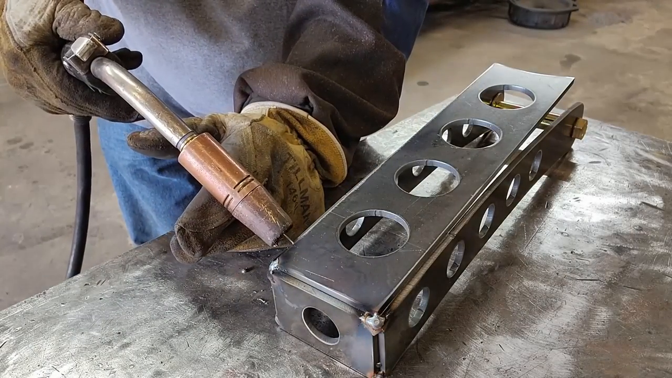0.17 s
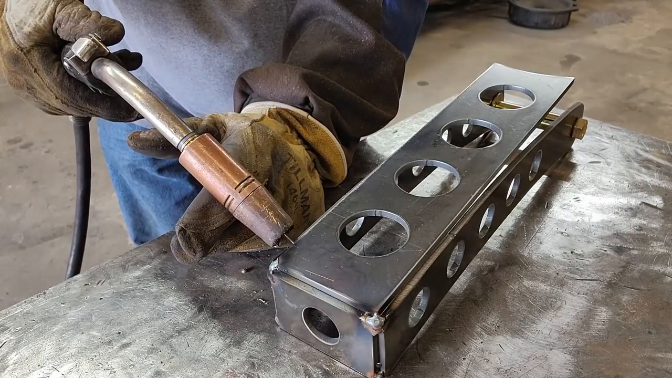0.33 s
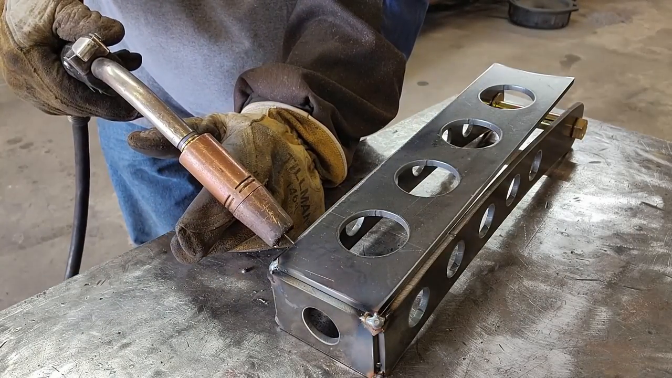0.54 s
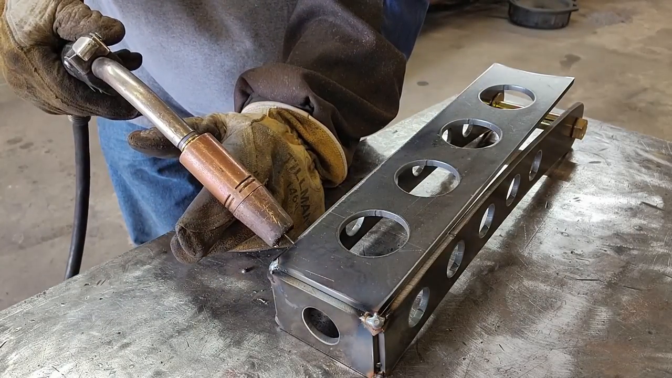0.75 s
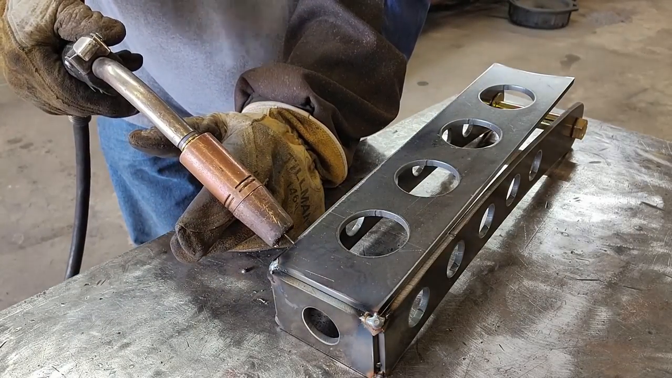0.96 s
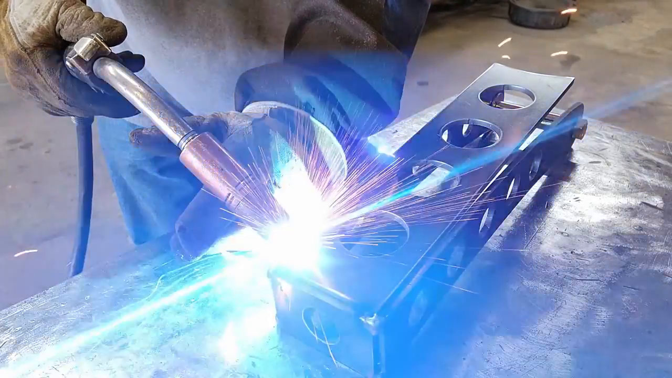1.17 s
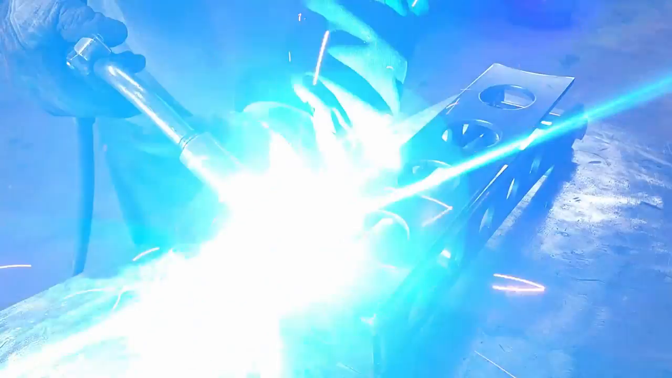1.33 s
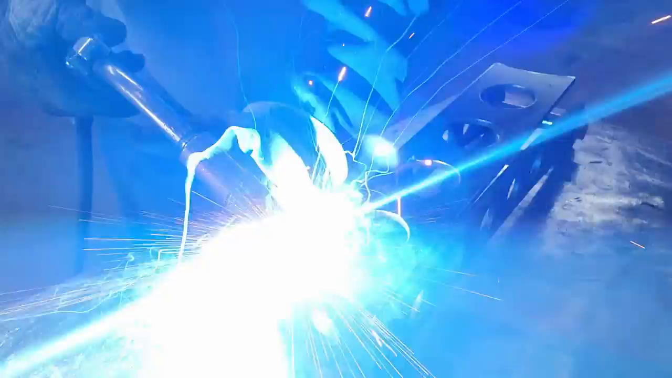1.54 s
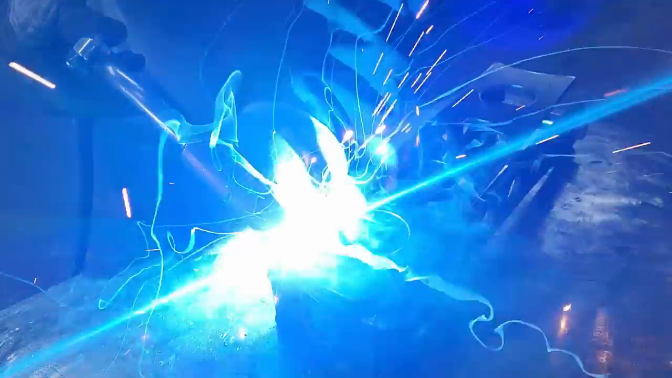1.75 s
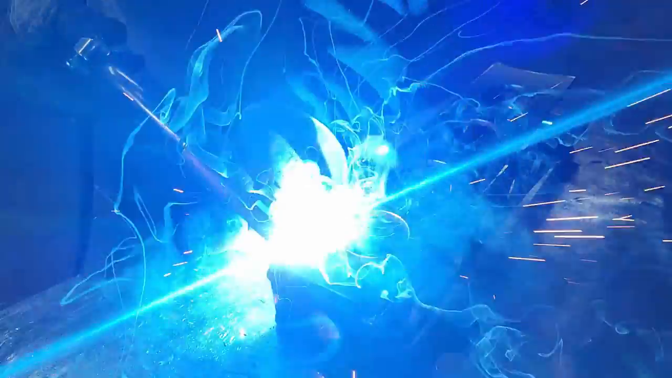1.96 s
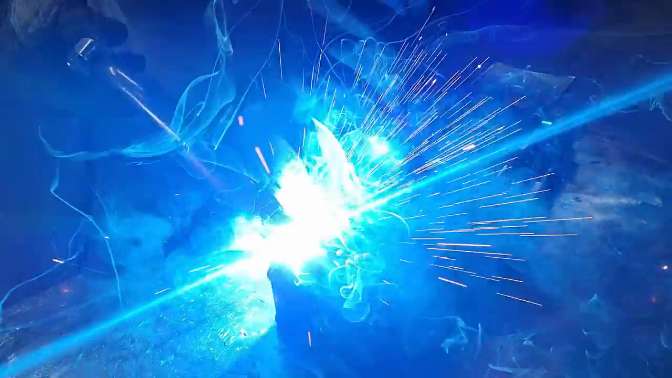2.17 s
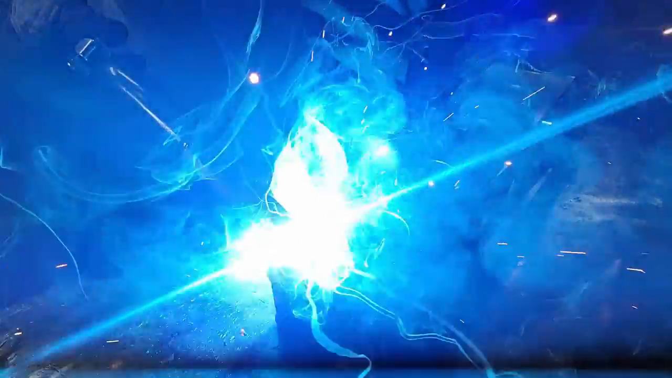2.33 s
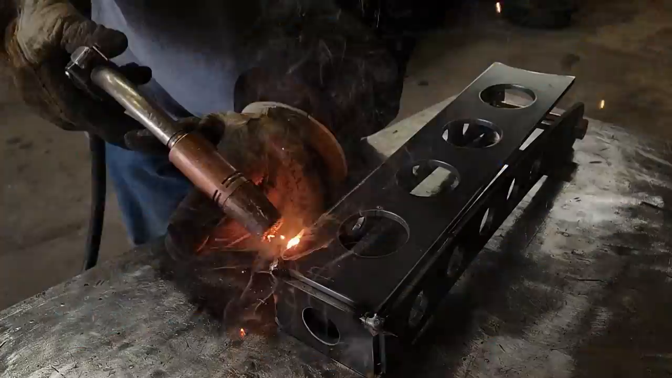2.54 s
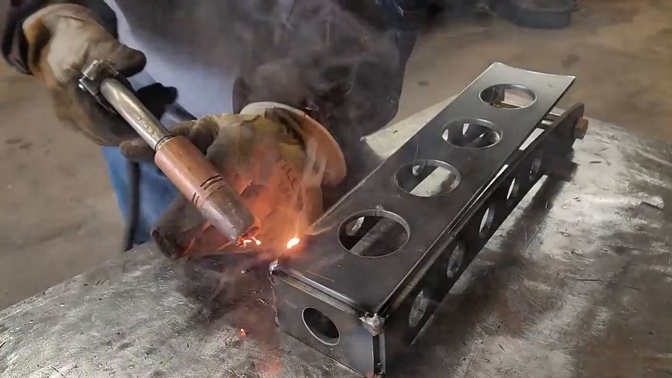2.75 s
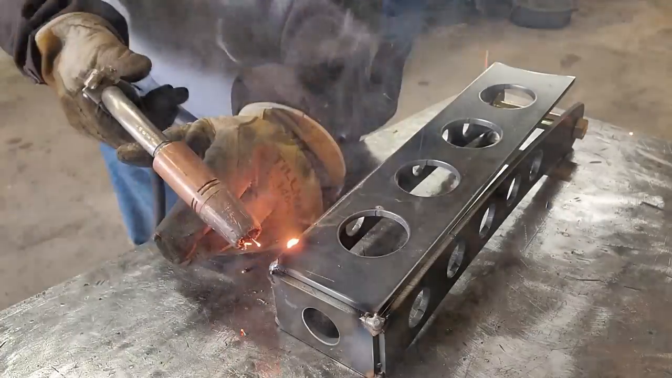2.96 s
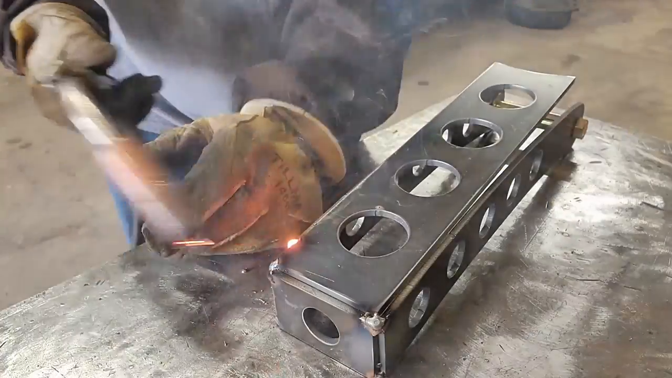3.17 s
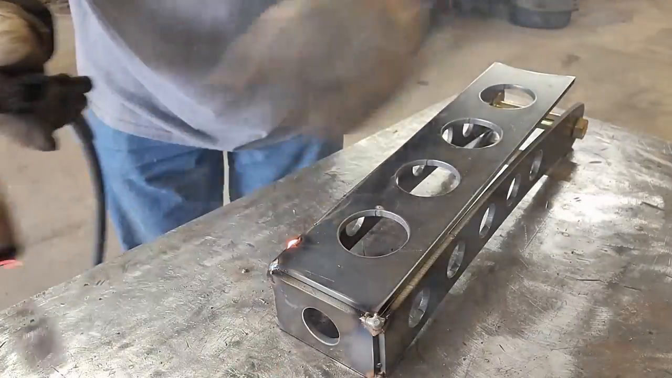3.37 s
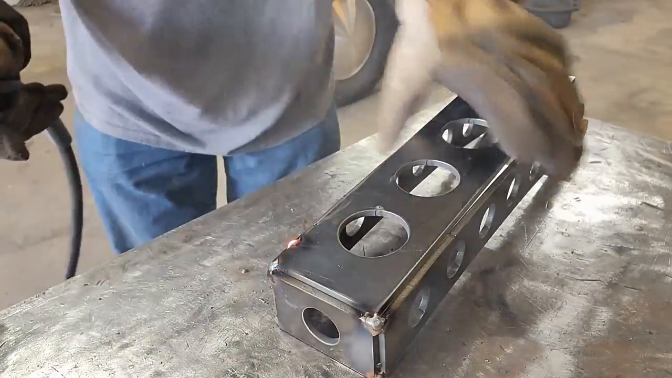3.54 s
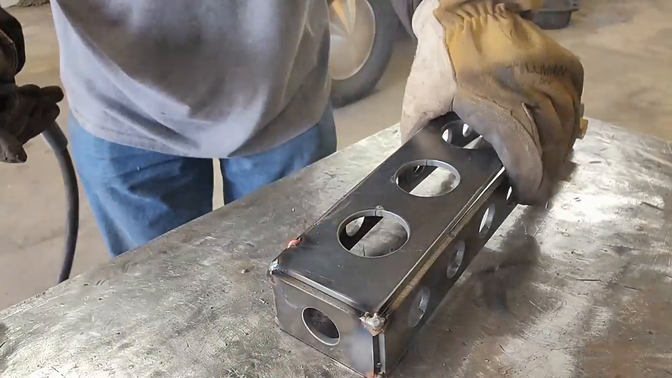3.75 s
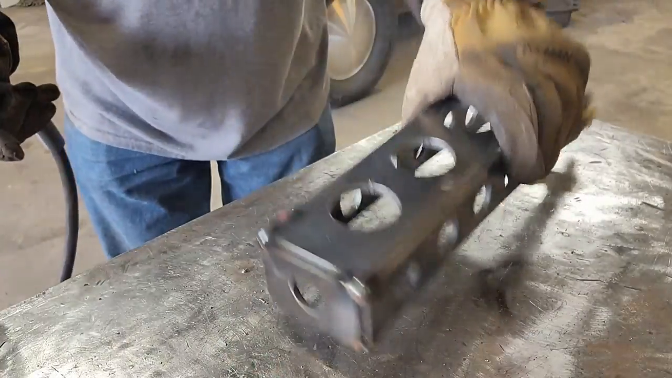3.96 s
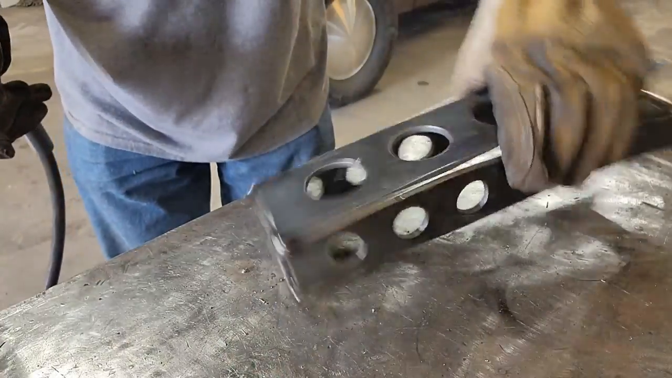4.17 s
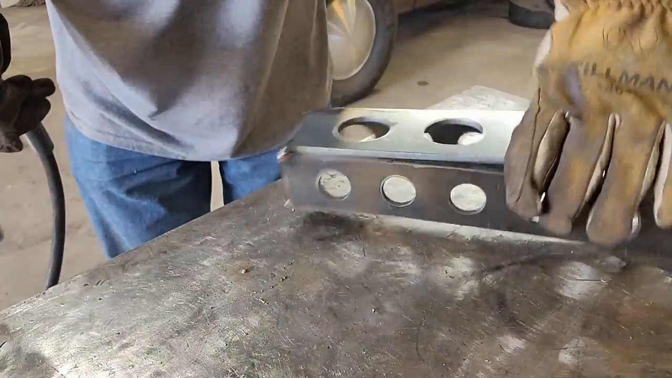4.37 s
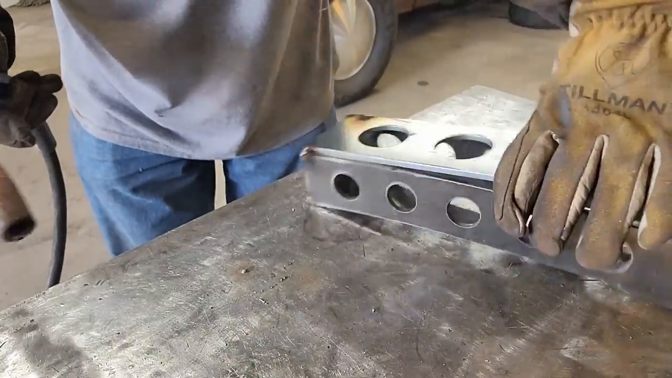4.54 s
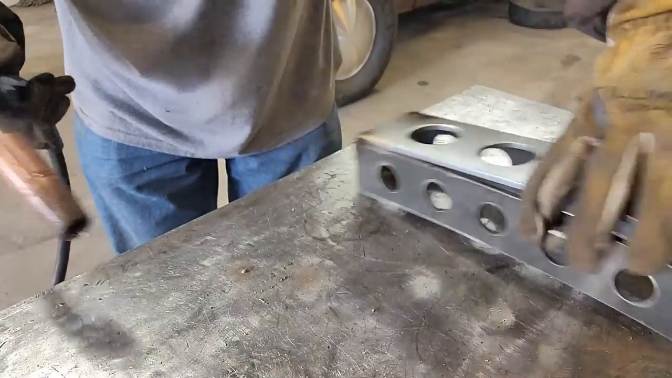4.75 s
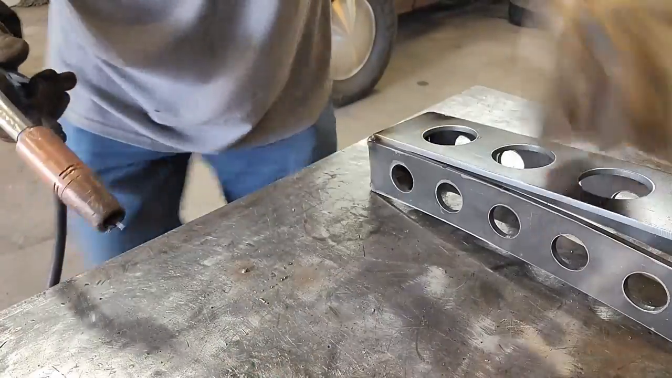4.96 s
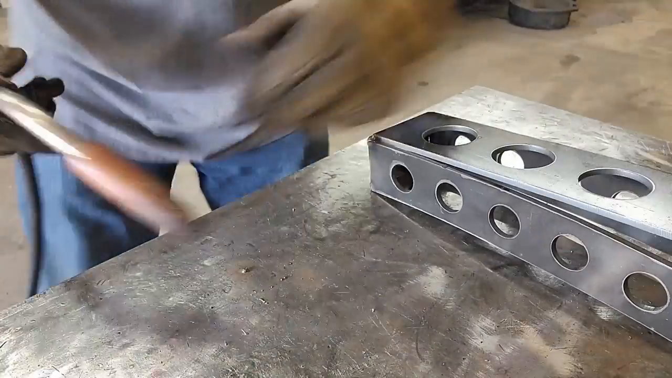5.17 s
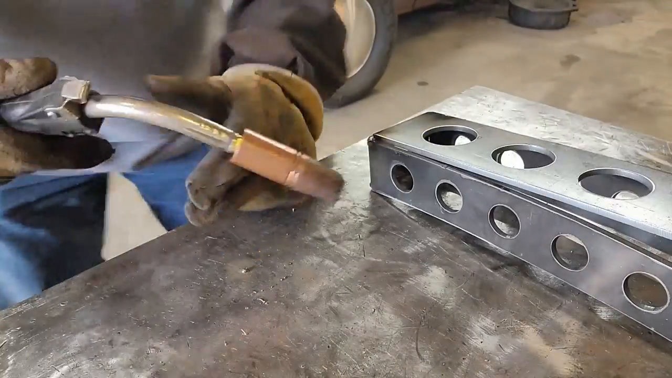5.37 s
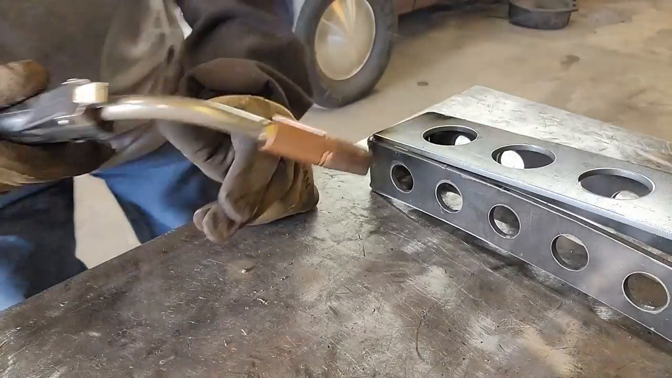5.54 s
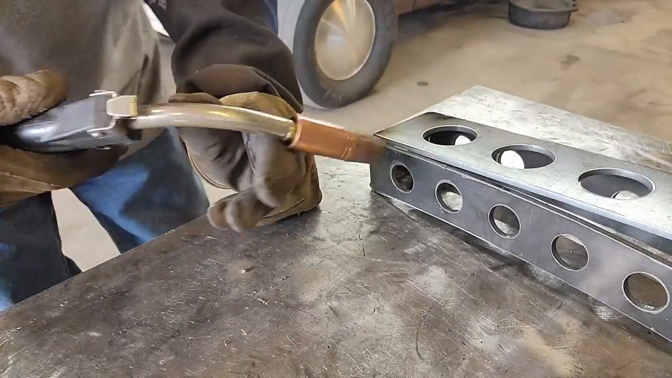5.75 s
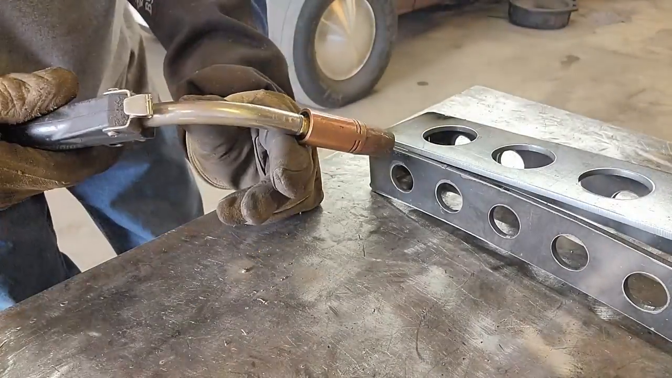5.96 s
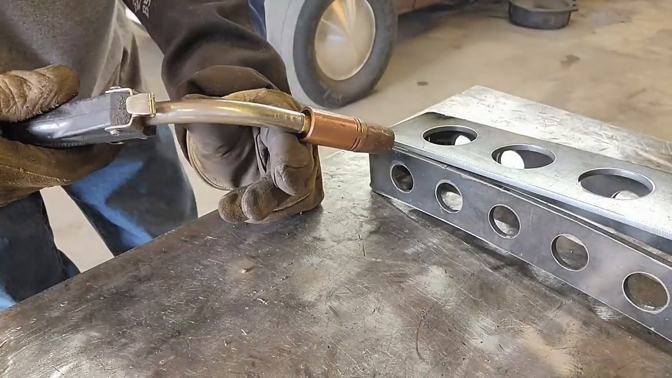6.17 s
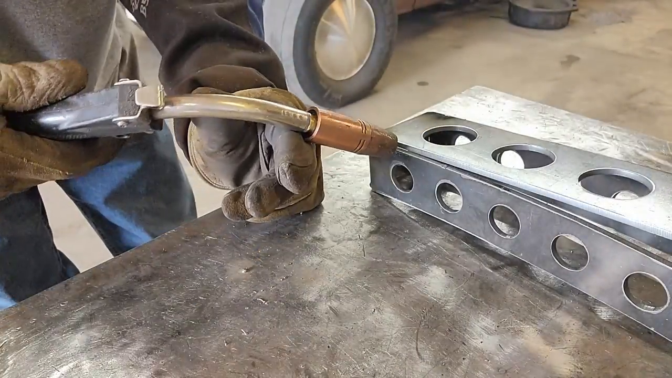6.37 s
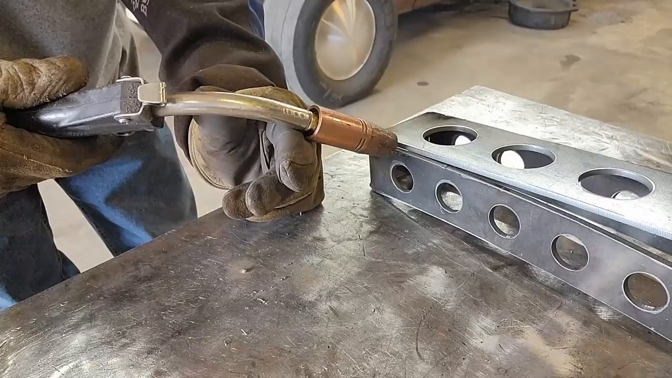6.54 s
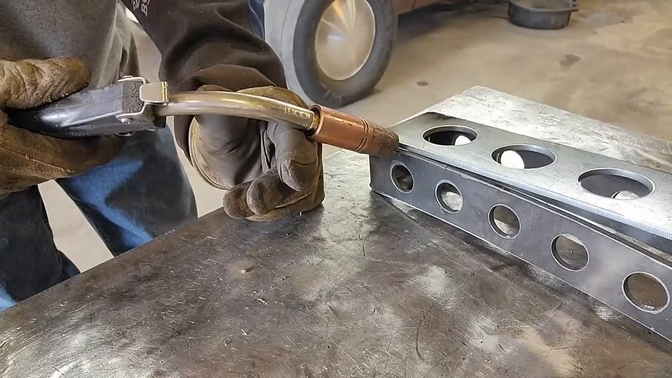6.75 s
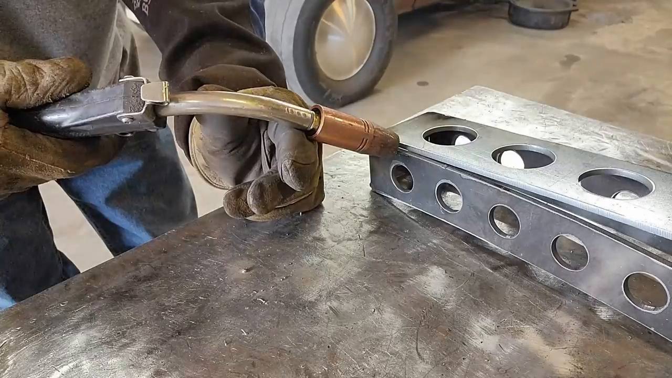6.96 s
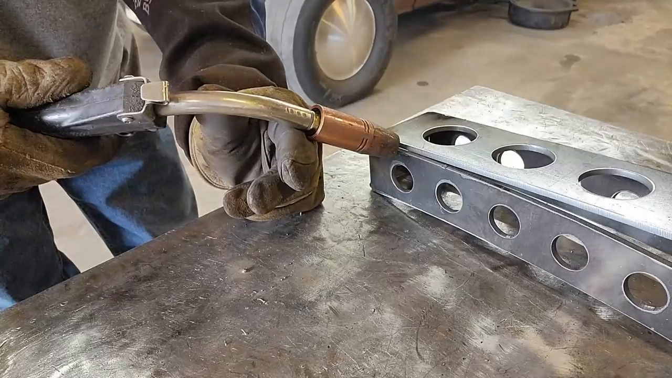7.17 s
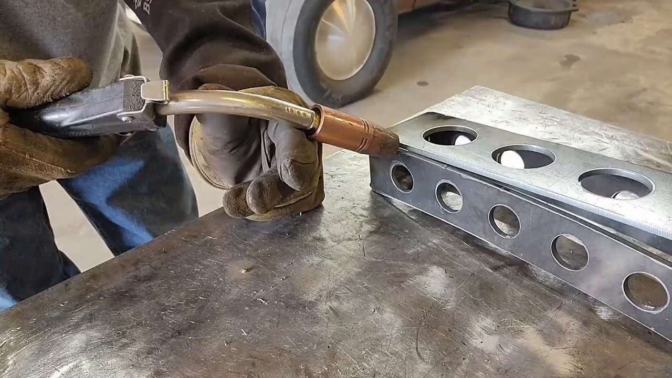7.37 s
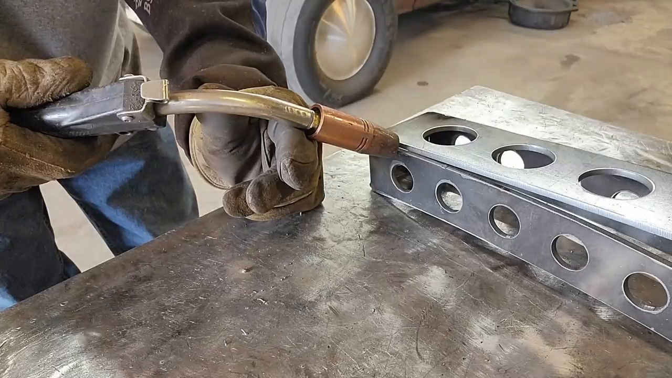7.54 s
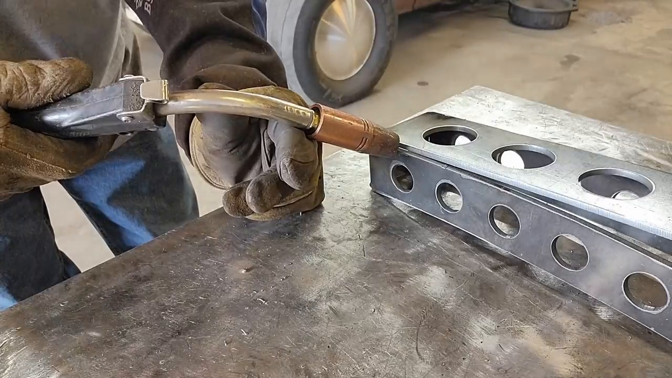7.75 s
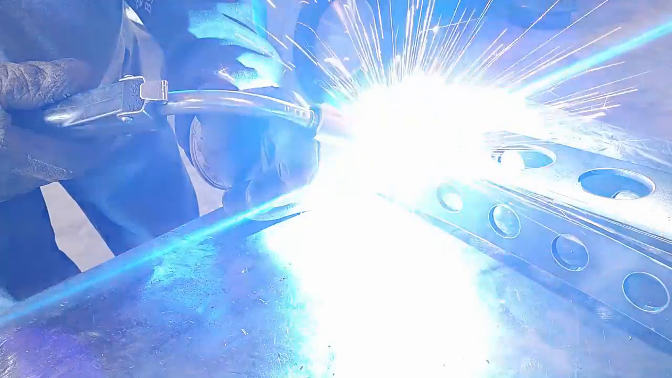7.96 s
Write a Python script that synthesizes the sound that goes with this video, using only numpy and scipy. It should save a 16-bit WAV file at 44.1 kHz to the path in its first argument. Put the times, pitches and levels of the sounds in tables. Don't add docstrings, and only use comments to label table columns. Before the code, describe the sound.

In a workshop with a low fan drone, a wire-feed welder suddenly strikes up close: bright sizzle, dense sharp pops and low air thumps that overload a phone microphone. It cuts off and the background sinks, then slowly returns. A glove rustles, a perforated steel box clanks onto a steel bench and scrapes briefly. Quiet scuffs and tiny metallic pings follow, then a second abrupt arc crackles at the end.

```python
import sys
import numpy as np
from scipy import signal
from scipy.fft import rfft, irfft, next_fast_len
from scipy.io import wavfile
from scipy.ndimage import uniform_filter1d

SR = 44100
rng = np.random.default_rng(int(sys.argv[2]) if len(sys.argv) > 2 else 0)


def decibels_to_gain(level_db):
    exponent = np.asarray(level_db, float) / 20
    return 10 ** exponent


def materialize(psi):
    bounded = np.clip(np.atleast_2d(psi).T, -1, 1)
    quanta = np.round(bounded * 32767).astype(np.int16)
    wavfile.write(sys.argv[1], SR, quanta)


N = 353241
T = np.arange(N) / SR
FIRST_ARC_S, SECOND_TACK_S = 1.0, 5


def arc():
    s, pop_db, body_db, pop_tilt_db = pops_in_order()
    touched = np.r_[np.diff(s) < 0.0055, False]
    sizzle_db, length_db = spells(s[~touched])
    between = ((s + np.roll(s, -1)) / 2)[touched]
    shorted_db = strikes(between, -9, np.hanning(int(0.005 * SR)))
    flutter_db = 2.5 * walk(600) + 0.8 * walk(120)
    crack = strikes(s - 0.0007, decibels_to_gain(pop_db + 10), np.ones(1))
    gas = rng.standard_normal(N) * decibels_to_gain(sizzle_db + shorted_db + flutter_db - 0.5)
    gas += flashes(s, pop_db) - crack
    lean_db = strikes(s, (pop_tilt_db + 7.5) / 2, np.hanning(int(0.005 * SR)))
    lit = uniform_filter1d(sizzle_db, SR // 50) > -85
    body = thump(s, body_db)
    crackle = resonate(gas, lit, length_db, lean_db) + whistle(sizzle_db + flutter_db)
    crackle += 0.4 * body + decibels_to_gain(-7.0) * band(crack, 3200, 3500)
    return crackle, 0.54 * body + puffs()


# (time [s], pop [dB], dull
# body [dB], low over high treble [dB])
ARC_POPS = [(1.0034, -9, -33.5, -5), (1.0912, 1, -17, -7.5), (1.2176, -6.5, -23.5, -1.5),
            (1.2215, -3, -19.5, -7), (1.2364, -7, -28.5, -7), (1.241, -3, -19, -11.5),
            (1.252, -6.5, -22.5, -9.5), (1.2615, -6.5, -23.5, -12.5), (1.2693, -5, -28.5, -6),
            (1.273, -6, -25, -14.5), (1.2795, -7.5, -27, -10.5), (1.2843, -6.5, -24, -7.5),
            (1.289, -13, -29, -4.5), (1.4052, -5, -31, -5.5), (1.4092, -4, -27.5, -3),
            (1.4297, -8, -28.5, -2.5), (1.4333, -4.5, -23, -10.5), (1.4526, -8, -20.5, -7),
            (1.4557, -6.5, -30, 0), (1.459, -4.5, -19, 0.5), (1.4678, -10.5, -25, -1.5),
            (1.4707, -7.5, -22.5, -13), (1.4776, -8.5, -20, -3), (1.4816, -8.5, -32, -3),
            (1.485, -8, -21, -8.5), (1.492, -9, -31, -3), (1.495, -6, -29, 1), (1.5034, -7, -19, 0.5),
            (1.5136, -7, -26.5, -1), (1.5168, -4, -17.5, -9), (1.5859, -5.5, -26.5, -1),
            (1.59, -1.5, -24, 3.5), (1.5928, -2, -24.5, 5),
            (1.6514, -5.5, -21, -1), (1.6552, -4, -13, -4.5), (1.6845, -7.5, -31, -7),
                 (1.687, -2.5, -16.5, -4), (1.712, -4, -21, -3.5), (1.737, -0.5, -15.5, -3.5),
                 (1.7612, -12, -23.5, -6), (1.7629, -4, -16, -6), (1.7961, -8.5, -27, -4.5),
                 (1.8006, -4.5, -21.5, -8), (1.8389, -7, -18.5, -7.5), (1.8804, -7, -16, -8.5),
                 (1.9048, -7.5, -28, -7.5), (1.908, -7, -24.5, -12), (1.934, -8, -19.5, -6),
                 (1.9389, -3, -16, 1.5), (1.9468, -5.5, -27, -5.5), (1.9633, -4, -26.5, -4.5),
                 (1.9682, 0.5, -25, -4), (1.9962, -6, -34.5, -10), (2.0143, -3.5, -28.5, 1.5),
                 (2.045, -9.5, -41.5, -9.5),
            (2.0574, -2, -20, -9.5), (2.0881, -4, -16, -5.5), (2.121, -5, -15, -3.5),
                (2.143, -7.5, -31, -3.5), (2.1472, -2, -14, -5), (2.1774, -4, -27.5, -9),
                (2.1811, -5.5, -20.5, -8), (2.2134, -3, -19.5, 5.5), (2.237, -7, -19.5, -7),
                (2.24, -4, -18.5, 0.5), (2.2427, -0.5, -22, -9), (2.2544, -6, -29, 0),
                (2.2871, -7.5, -32, -8.5), (2.2898, -1, -25.5, -7.5), (2.3054, -5.5, -23, -11.5),
                (2.3269, -8.5, -19.5, -3.5), (2.3384, -6, -28, 0.5), (2.3639, -7, -6, 11.5),
                (2.3782, -10, -14.5, 2), (2.3806, -3.5, -12, 11), (2.4164, -9.5, -40, -9.5),
                (2.4204, -7.5, -29.5, -7),
            (7.8293, -11.5, -29, -3), (7.863, -1, -15.5, -2), (7.8709, -2, -18, -5.5),
                    (7.8766, -1.5, -25, -5), (7.8978, -5, -26.5, -9.5), (7.9055, -3, -28, -12.5),
                    (7.9658, -3, -10.5, 0.5), (7.976, -3.5, -26, -5.5), (7.984, -6, -22, -12),
                    (7.9904, -8.5, -29.5, -8.5), (7.9946, -4, -23.5, 0.5),
            (1.0101, -7, -29.5, -5), (1.083, -6.5, -14, -2), (1.088, -6, -12.5, -2),
               (1.216, -7.5, -18.5, -3), (7.948, -8.5, -19, -4.5), (7.9579, -7, -17.5, 0),
               (7.9637, -8, -19, -3), (7.9975, -7, -28, -5)]


def pops_in_order():
    pops = ARC_POPS
    return np.transpose(sorted(map(tuple, pops)))


# (time [s], sizzle [dB], arc length [dB], swell after a pop or spell
# start [dB/s])
ARC_SPELLS = [(0, -90, 0.5, 0.5), (.978, -64.5, -4.5, 400.5), (0.991, -33, 9, 298.5),
              (1.004, -14, 1.5, -100), (1.029, -13, 6.5, 69), (1.095, -20.5, 7.5, 129),
              (1.143, -17, 7.5, -20), (1.219, -21, -0.5, 98.5), (1.297, -28, 9, -30.5), (1.4, -23, 0, 100),
              (1.525, -33.5, -3.5, 159.5), (1.579, -17.5, -0.5, 3.5), (1.596, -23, 2.5, -300),
              (1.62, -29, 0.5, 300), (1.654, -26.5, 0, 149.5), (1.8, -28, -1, 349),
              (1.885, -25, -0.5, 199.5), (2.089, -35.5, 1.5, 500), (2.119, -24, 0, 248),
              (2.26, -22.5, 1, 100.5), (2.383, -24.5, -1.5, 151), (2.425, -90, -1, -7), (7.8, -60, 13, 397),
              (7.816, -35.5, 13.5, 99), (7.828, -18, 0.5, -200), (7.845, -21.5, -0.5, 202),
              (7.864, -15, -1.5, -100), (7.88, -17.5, 1, 116), (7.945, -11, -2, 6.5),
              (7.968, -20.5, 0.5, 150)]


def spells(pops_s):
    start, level_db, length_db, swell = np.transpose(ARC_SPELLS)
    now = np.maximum(np.searchsorted(start, T, "right") - 1, 0)
    slew = max(int(0.0032 * SR), 1)
    marks = np.sort(np.r_[pops_s, start])
    age = T - marks[np.maximum(np.searchsorted(marks, T, "right") - 1, 0)]
    sizzle_db = uniform_filter1d(level_db[now], slew) + swell[now] * age
    return sizzle_db, uniform_filter1d(length_db[now], 3 * slew)


def flashes(s, pop_db):
    age = np.arange(-150, 151) / SR + 0.0007
    flare = strikes(s, decibels_to_gain(pop_db), (age > 0) * np.exp(-(age / 0.0015) ** 2))
    noise = np.sign(rng.standard_normal(N)) * flare
    return decibels_to_gain(-4.0) * signal.lfilter(*signal.butter(1, 11920, fs=SR), noise)


def mode_tilt(hz, length_db, cold_db):
    if hz < 2400:
        return -0.1 * length_db
    if 3550 < hz < 4600:
        return 0.63 * length_db
    if 5000 < hz <= 5600:
        return 1 - 1.1 * length_db - 0.6 * cold_db
    if 5600 < hz < 6050:
        return 0.63 * length_db - 0.6 * cold_db
    if 6050 < hz < 11000:
        return cold_db * (hz < 8000) + 0.045 * length_db
    if hz > 11000:
        return 1 - 0.91 * length_db
    return -0.15 * length_db


# (frequency [Hz], width [Hz], level [dB])
FIRST_NOZZLE = [(990, 1200, -20), (1850, 1000, -20.5), (2618, 260, -7.5), (2930, 270, -8.5),
                (3300, 390, -7), (3866, 560, -7.5), (5490, 1000, 0.5), (5790, 480, -6.5), (6280, 290, -9),
                (6880, 520, -9.5), (7630, 1300, -9), (9530, 1100, -11.5), (12130, 1540, -4.5),
                (13300, 1300, -4), (15150, 1110, 0.5)]
SECOND_NOZZLE = [(1100, 1000, -20), (2400, 1400, -16), (4300, 1300, -11), (6230, 900, 2), (8500, 700, -12),
                 (10000, 800, -13), (12100, 1600, -9), (13800, 1200, -9), (15400, 900, -6)]


def resonate(gas, lit, length_db, lean_db):
    cold_db = 8 * (T > FIRST_ARC_S) * np.exp(-np.clip(T - FIRST_ARC_S, 0, None) / 0.02)
    out = np.zeros(N)
    for nozzle, on in ((FIRST_NOZZLE, lit & (T < SECOND_TACK_S)), (SECOND_NOZZLE, lit & (T >= SECOND_TACK_S))):
        power = sum(decibels_to_gain(2 * db) * width for hz, width, db in nozzle) * np.pi / SR
        for k, (hz, width, db) in enumerate(nozzle):
            side = int(hz < 4600) - int(hz > 9000)
            tilt_db = mode_tilt(hz, length_db, cold_db) + side * lean_db
            gain = decibels_to_gain(db + tilt_db + 5.5 + 1.8 * walk(60))[on]
            mode = band(band(gas[on], hz, 1.13 * width), hz, 1.13 * width)
            out[on] += (-1) ** k * gain * mode / np.sqrt(power)
    return out


# (time [s], low pitch [Hz], high pitch [Hz], level over the sizzle [dB])
WHISTLE_GLIDE = [(1.005, 4250, 6300, -16), (1.03, 4050, 6100, -7), (1.06, 3900, 5950, -5),
                 (1.09, 3720, 5450, -6), (1.11, 3850, 5700, -7), (1.15, 3950, 5820, -5),
                 (1.19, 3900, 5850, -6), (1.215, 3700, 5600, -10), (1.23, 3700, 5500, -30)]


def whistle(level_db):
    low_hz, high_hz, db = curve(WHISTLE_GLIDE)
    on = (T > WHISTLE_GLIDE[0][0]) & (T < WHISTLE_GLIDE[-1][0])
    lowpass = signal.butter(2, 170, fs=SR)
    tones = 0
    for hz, up_db in ((low_hz, 0), (high_hz, 3.5)):
        phase = 2 * np.pi * np.cumsum(hz) / SR
        for carrier in (np.cos(phase), np.sin(phase)):
            breath = unit(signal.lfilter(*lowpass, rng.standard_normal(N)))
            tones = tones + decibels_to_gain(up_db) * breath * carrier
    return on * decibels_to_gain(level_db + db) * tones / 2


def thump(s, body_db):
    burst_db = body_db + 13.0
    thud = np.sign(rng.standard_normal(N)) * strikes(s, decibels_to_gain(burst_db), np.hanning(int(0.0062 * SR)))
    return decibels_to_gain(-2.0) * band(band(thud, 430, 1100), 430, 1100)


# (time [s], signed amplitude [full scale])
AIR_PUFFS = [(1.092, 0.25), (1.221, -0.056), (1.2403, .2), (1.2614, -0.058), (1.272, -0.13),
             (1.2864, -0.18), (1.41, -0.14), (1.4596, -0.04), (1.5177, -0.09), (1.6542, -0.26),
             (1.6874, 0.23), (1.7115, -0.37), (1.7367, -0.24), (1.7638, -0.33), (1.801, -0.11),
             (1.8398, -0.11), (1.8787, -0.43), (1.9089, -0.16), (1.9381, -.25), (2.0142, 0.09),
             (2.0595, -0.029), (2.0894, 0.36), (2.121, -0.38), (2.1473, -0.21), (2.18, -0.31),
             (2.214, -0.11), (2.2433, -0.093), (2.2895, -.091), (2.307, -0.037), (2.329, 0.16),
             (2.3633, -0.87), (2.3808, -0.86), (7.8636, -0.044), (7.878, -0.098), (7.9572, -0.06),
             (7.9668, 0.062), (7.983, -0.11), (7.9944, 0.038)]


def puffs():
    puff_s, puff = np.transpose(AIR_PUFFS)
    push = strikes(puff_s + 0.0011, puff, np.hanning(int(0.0036 * SR)))
    swing = 2 * np.pi * 62
    high_pass = signal.bilinear([1, 0, 0], [1, 0.37 * swing, swing ** 2], SR)
    return signal.lfilter(*high_pass, push) - decibels_to_gain(1.0) * band(push, 34, 30)


# (time [s], peak [dB], pitch [Hz])
POOL_PLOPS = [(1.086, -12, 770), (1.219, -12, 2100), (1.238, -13, 1850), (1.311, -33, 2240),
              (1.408, -21, 1850), (1.431, -17, 1590), (1.457, -21, 751), (1.502, -21, 982),
              (1.515, -14.5, 958), (1.589, -21, 1730), (1.653, -9.5, 950), (1.686, -13, 1730),
              (1.711, -21, 834), (1.735, -12, 1750), (1.762, -15.5, 1210), (1.798, -18, 937),
              (1.834, -23, 942), (1.838, -15, 880), (1.879, -17, 840), (1.903, -23, 964),
              (1.937, -11, 2370), (1.966, -19, 2240), (1.995, -25, 2330), (2.013, -21, 1810),
              (2.055, -13, 1530), (2.087, -11.5, 1690), (2.12, -16, 961), (2.146, -16, 982),
              (2.179, -17, 2360), (2.213, -18, 953), (2.238, -11.5, 1920), (2.288, -18, 2342),
              (2.304, -19, 886), (2.326, -17, 1300), (2.362, -4, 982), (2.379, -8, 803), (2.419, -26, 751)]
MORE_POOL_PLOPS = [(2.362, -6, 390), (2.379, -9, 300), (2.145, -15, 530), (1.7, -15, 480),
                   (7.862, -13, 1050), (7.871, -14.5, 1080), (7.956, -13.5, 700), (7.965, -11, 680)]


def plops():
    out, age = np.zeros(N), np.arange(-300, 301) / SR
    length_s = 0.0013
    for s, db, hz in list(POOL_PLOPS) + list(MORE_POOL_PLOPS):
        at = int((s + length_s) * SR)
        out[at - 300:at + 301] += decibels_to_gain(db - 3.5) * np.exp(-(age / length_s) ** 2) * np.cos(2 * np.pi * hz * age)
    return out


# (time [s], blow [dB], contact [ms], bench clatter [dB], clatter t60 [s])
LIFT_BLOWS = [(4.205, -19, 12, -18.5, 0.24)]
TOUCH_BLOWS = [(4.528, -21, 5, -23.5, 0.245)]
DROP_BLOWS = [
    (4.594, -6, 14, -18.5, 0.4),
    (4.628, -25.5, 4, -30, .05),
    (4.682, -24.5, 4, -28.5, 0.05),
]
# (frequency [Hz], level [dB], t60 [s])
LIFTED_BOX = [(101, -4.5, 0.13), (375.7, 1, 0.26), (1015, 4, 0.089), (1856, 1, 0.13), (2891, -14, 0.071),
              (3112, -16, 0.2), (3266, -9, 0.16), (3710, -12, 0.4), (3970, 0, 0.13), (5070, -4, 0.133),
              (5240, -12, 0.14), (7220, -7.5, 0.074), (9200, -11, 0.17), (11450, -24, .15),
              (14520, -22, 0.2)]
TOUCHING_BOX = [(1300, -5, .08), (1857, 4.5, .07), (2275, 1, .06), (2584, 1.5, 0.2), (3133, -3, 0.57),
                (3740, -6.5, 0.32), (3838, -14, .14), (4000, -12, .12), (4743, -11, .2), (5190, -15, .19),
                (6412, -13, .16), (7203, -13.5, 0.088)]
DROPPED_BOX = [(390, -21, 0.3), (1333, -8, .1), (1610, -9, 0.25), (1826, -2.5, 0.15), (2571, 1, 0.26),
               (3128, -13.5, .6), (3402, -14.5, 0.35), (3677, -5.5, 0.1), (3247, -17, 0.5),
               (3828, -17, 0.4), (4738, -17, 0.6), (92, -17, .4), (6105, -6, 0.05), (6611, -11.5, .15)]
# (time [s], level [dB])
DRAG_LEVEL = [(4.6, -65), (4.64, -38), (4.7, -35), (4.76, -37), (4.82, -39.5), (4.88, -41.5), (4.91, -51.5),
              (4.94, -80), (5.03, -76)]
# (frequency [Hz], level [dB per Hz])
DRAG_SPECTRUM = [(180, -16), (400, -7.5), (1200, -7.5), (2500, -10.5), (4000, -9.5), (7350, -14.5),
                 (7700, -23), (10500, -29), (13500, -24), (16000, -28)]
# (time [s], length [s], frequency [Hz], level [dB])
EDGE_SONGS = [(4.69, .04, 3960, -35), (4.71, .14, 1140, -34), (4.78, .14, 2055, -39), (4.8, .23, 3110, -45),
              (4.68, .11, 4738, -44), (4.66, .035, 1826, -27), (4.84, .18, 1450, -54),
              (4.97, .12, 10620, -76), (4.69, .04, 13800, -50), (4.84, .24, 5250, -62),
              (4.75, .03, 6300, -42), (4.71, .07, 7300, -44), (4.78, .06, 6150, -46),
              (4.81, .08, 7450, -47)]
# (time [s], length [s], level [dB])
GLOVE_SCUFFS = [(2.998, .004, -52), (3.237, 0.047, -52), (3.678, 0.15, -61), (4.961, 0.056, -54),
                (5.13, 0.09, -55), (5.279, 0.12, -55.5), (5.451, 0.04, -55), (5.53, 0.06, -54),
                (5.6, 0.051, -59), (4.19, 0.027, -41.5), (4.516, .022, -43), (5.24, .004, -52),
                (4.949, 0.8, -64.5), (5.673, .16, -62)]
# (frequency [Hz], level [dB per Hz])
SCUFF_SPECTRUM = [(1500, 7.5), (3000, 13), (7000, 4), (8000, -4), (11000, -7), (14500, -4), (16000, -7)]


def handling():
    grit_db = curve(DRAG_LEVEL, -140)[0] + 3.3 * walk(200) + 1.5 * walk(30.07) + 2.5
    grit = rng.standard_normal(N) * decibels_to_gain(grit_db)
    drag = bench(decibels_to_gain(-2.5) * grit, DRAG_SPECTRUM, plain_db=-4.0, ring_db=-39.0, t60=0.12)
    for s, length, hz, db in EDGE_SONGS:
        tone = np.sin(2 * np.pi * hz * T + 1.1 * walk(60))
        drag += decibels_to_gain(db) * burst(s, length) * decibels_to_gain(3 * walk(70) + 3) * tone
    rustle = sum(decibels_to_gain(db) * burst(s, length) for s, length, db in GLOVE_SCUFFS) * decibels_to_gain(2.0 * walk(150))
    blows = box(LIFT_BLOWS, LIFTED_BOX) + box(TOUCH_BLOWS, TOUCHING_BOX) + box(DROP_BLOWS, DROPPED_BOX)
    return blows + drag + colour(rustle * rng.standard_normal(N), SCUFF_SPECTRUM)


# (frequency [Hz], level [dB per Hz])
CLATTER_SPECTRUM = [(60, -41), (200, -13), (700, -4.5), (1800, -3), (3000, -7.5), (6400, -15), (7400, -24),
                    (8000, -26), (16000, -32)]


def box(hits, modes):
    force, clatter = 0, 0
    for s, db, ms, bench_db, t60 in hits:
        rattle = fade(s, 3 * ms / 1000) * rng.standard_normal(N) / np.sqrt(ms * SR / 1500)
        blow = strikes([s + ms / 8000], [decibels_to_gain(db - 0.5)], np.ones(1))
        force = force + decibels_to_gain(db - 5.5) * rattle + blow
        clatter = clatter + decibels_to_gain(bench_db) * fade(s, t60, 0.0015)
    stilled = np.exp(-np.log(1000) * np.clip(T - 4.7, 0, None) / 0.12)
    contacts = clatter * rng.standard_normal(N)
    return stilled * ring(force, modes) + bench(contacts, CLATTER_SPECTRUM, plain_db=-7.5, ring_db=-41.5, t60=0.0396)


def bench(force, points, plain_db, ring_db, t60):
    hz = np.linspace(250, 15700, 110) + 60 * rng.standard_normal(110)
    size, life = rng.standard_normal((2, 110))
    modes = zip(hz, ring_db + 1.3 * size, t60 * np.exp(0.25 * life))
    return colour(ring(force, modes, restless_db=3) + decibels_to_gain(plain_db) * force, points)


# (time [s], peak [dB], crack [dB])
GRIP_CONTACT = (3.902, -38, -43)
TORCH_CONTACT = (5.668, -58, -49)
# (frequency [Hz], level [dB], t60 [s])
GRIP_MODES = [(1970, -4, 0.053), (5056, -11, 0.15), (5430, -3.5, .078), (6380, 0.5, 0.097), (6900, -5, 0.1),
              (13900, -13, .069), (15100, -3, 0.058)]
TORCH_MODES = [(5658, 3, .24), (6920, 2, 0.31), (8700, -7, .3), (9550, -6, 0.19), (10700, -6, .19),
               (11650, -7, .25), (12780, 0, .08), (13390, -9, .2), (13600, -6, .2), (15200, -2, .25),
               (14500, 0, .25), (7800, -4, .15)]
# (time [s], frequency [Hz], peak [dB], t60 [s])
COOLING_PINGS = [(7.116, 6562, -50, .25), (7.116, 6153, -54, .13), (7.25, 6153, -62, .15),
                 (7.495, 5658, -51, .42), (7.495, 6153, -58, .15), (7.753, 12800, -64, .02),
                 (3.68, 6450, -64, .3), (2.999, 9000, -68, .08)]
# (time [s], level [dB])
BELT_SQUEAKS = [(0, -68.5), (.495, -69), (3.145, -69), (3.675, -70), (5.255, -73), (5.795, -69),
                (6.312, -73), (6.849, -68), (7.368, -72)]


def ticks():
    out = 0
    for (s, db, crack_db), modes in ((GRIP_CONTACT, GRIP_MODES), (TORCH_CONTACT, TORCH_MODES)):
        crack = colour(decibels_to_gain(crack_db) * fade(s, 0.17) * rng.standard_normal(N), SCUFF_SPECTRUM)
        out = out + crack + ring(strikes([s], [decibels_to_gain(db)], np.ones(1)), modes)
    for s, hz, db, t60 in COOLING_PINGS:
        out = out + decibels_to_gain(db) * fade(s, t60) * np.sin(2 * np.pi * hz * T)
    belt = sum(decibels_to_gain(db) * fade(s, 0.35, 0.012) for s, db in BELT_SQUEAKS)
    return out + decibels_to_gain(2.0) * belt * unit(band(rng.standard_normal(N), 14920, 120))


def room(x, early_db=-14, early_t60=0.14, late_db=-19, late_t60=0.56, dull_hz=7000):
    age = T[:SR]
    early, late = (unit(np.exp(-np.log(1000) * age / t)) * (age > 0.003) * rng.standard_normal(SR) / np.sqrt(SR)
                   for t in (early_t60, late_t60))
    echo = decibels_to_gain(early_db) * early + decibels_to_gain(late_db) * signal.lfilter(*signal.butter(1, dull_hz, fs=SR), late)
    return signal.fftconvolve(x, echo)[:N]


# (frequency [Hz], level [dB per Hz])
RUSH_SPECTRUM = [(14, -60.5), (44, -3), (142, 0.5), (248, -6.5), (301, -5.5), (367, -4), (440, -13.5),
                 (678, -9), (1220, -18.5), (2800, -23), (6800, -36), (7800, -50.5), (10000, -73),
                 (16000, -61.5)]
# (frequency [Hz], width [Hz], level [dB])
FAN_HUM = [(107, 11, -50), (201.8, 6.5, -52.5), (297.3, 19, -44), (370, 7.2, -51.5), (694, 20, -60)]


def shop():
    rush = colour(rng.standard_normal(N), RUSH_SPECTRUM) * decibels_to_gain(0.4 * walk(9.9) + 1.5)
    hum = sum(decibels_to_gain(db + 41.5) * unit(band(rng.standard_normal(N), hz, width)) for hz, width, db in FAN_HUM)
    return (rush + hum) * decibels_to_gain(-39 + ducking())


def ducking():
    sunk_s, recover_s = 2.5, 1.37
    sinking = np.clip((T - FIRST_ARC_S) / (sunk_s - FIRST_ARC_S), 0, 1)
    held = np.exp(-np.clip(T - sunk_s, 0, None) / recover_s)
    dip_db = -8 * np.exp(-((T - 2.55) / 0.031) ** 2)
    return sinking * (-2 - 9.5 * held) + dip_db


def ring(x, modes, restless_db=0):
    busy = np.flatnonzero(np.abs(x) > 1e-6)
    span, out = slice(busy[0], busy[-1] + SR // 2), np.zeros(N)
    for hz, db, t60 in modes:
        r = np.exp(-np.log(1000) / (min(t60, 0.6) * SR))
        w = 2 * np.pi * hz / SR
        wander = np.interp(T[span] * 25, np.arange(210), rng.standard_normal(210))
        favour = decibels_to_gain(db + restless_db * wander)
        out[span] += signal.lfilter([0, np.sin(w)], [1, -2 * r * np.cos(w), r * r], favour * x[span])
    return out


def band(x, hz, width):
    return signal.lfilter(*signal.iirpeak(min(hz, 16500), hz / width, SR), x)


def colour(x, points):
    hz, db = np.transpose(points)
    size = next_fast_len(N, True)
    gain = decibels_to_gain(np.interp(np.log(np.fft.rfftfreq(size, 1 / SR) + 1), np.log(hz), db))
    return irfft(rfft(x, size) * unit(gain), size)[:N]


def unit(x):
    return x / np.sqrt(np.mean(x ** 2))


def strikes(times, sizes, shape):
    x = np.zeros(N)
    np.add.at(x, np.clip((np.asarray(times) * SR).astype(int), 0, N - 1), sizes)
    return signal.fftconvolve(x, shape, "same")


def fade(s, t60, rise=0.00036):
    age = np.clip(T - s, 0, None)
    return (1 - np.exp(-age / rise)) * np.exp(-np.log(1000) * age / t60)


def burst(s, length):
    return np.clip(np.minimum(T - s, s + length - T) / (0.39 * length), 0, 1)


def walk(rate):
    k = max(int(SR / rate), 2)
    return 1.2 * uniform_filter1d(np.repeat(rng.standard_normal(N // k + 1), k), k)[:N]


def curve(rows, outside=None):
    s, *columns = np.transpose(rows)
    return [np.interp(T, s, c, outside, outside) for c in columns]


def scene():
    crackle, air = arc()
    near = crackle + plops() + handling() + ticks()
    return (near + room(near) + air + shop())[None]


def band_limit(x):
    return signal.sosfilt(signal.butter(12, 16290, fs=SR, output="sos"), x)


def record(dry):
    top = signal.sosfilt(signal.ellip(8, 0.3, 50, 15800, fs=SR, output="sos"), dry)
    mix = np.clip(np.tanh(0.64 * top) / 0.75, -1, 1)
    return band_limit(mix)


dry = scene()
out = record(dry)
materialize(out)
```